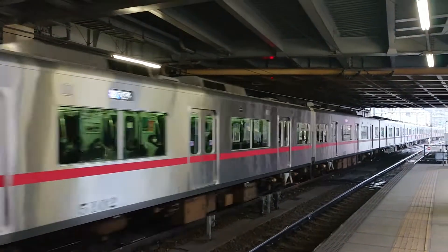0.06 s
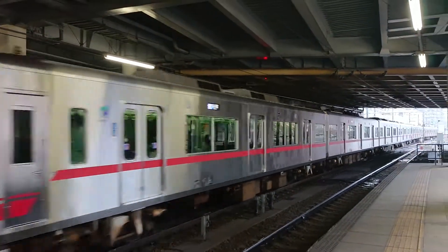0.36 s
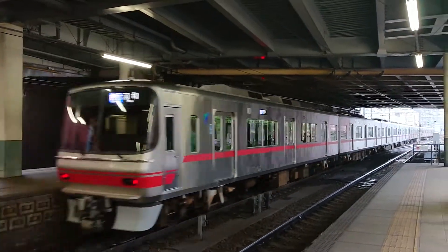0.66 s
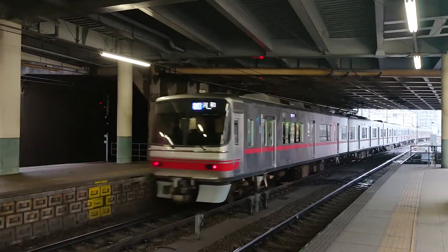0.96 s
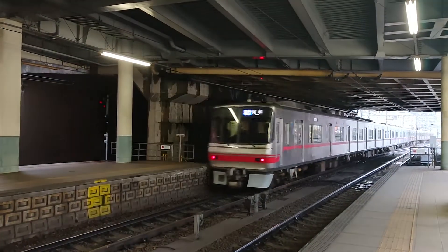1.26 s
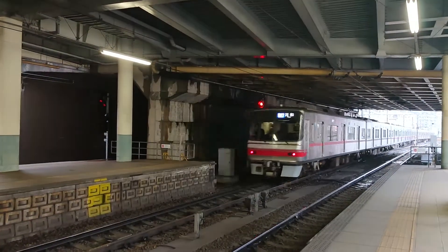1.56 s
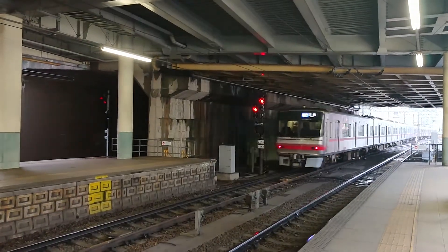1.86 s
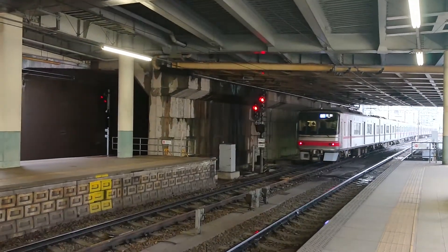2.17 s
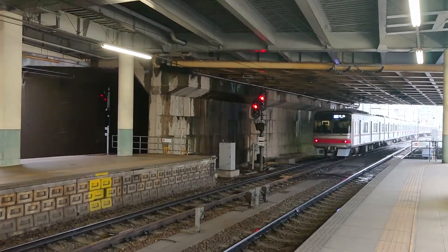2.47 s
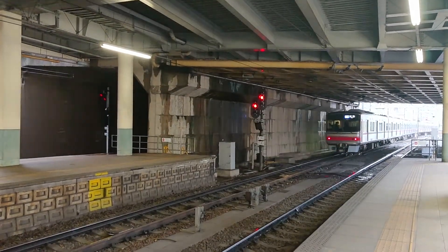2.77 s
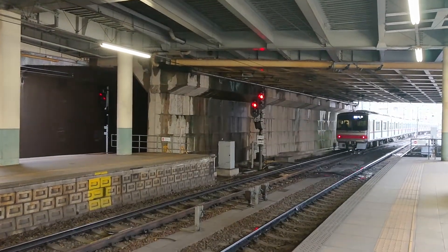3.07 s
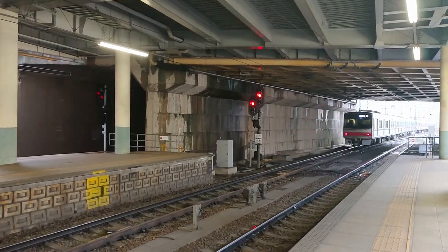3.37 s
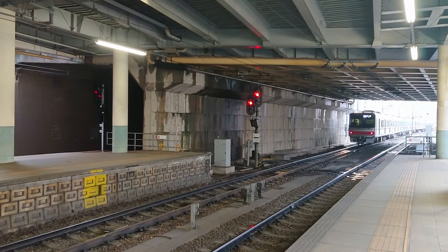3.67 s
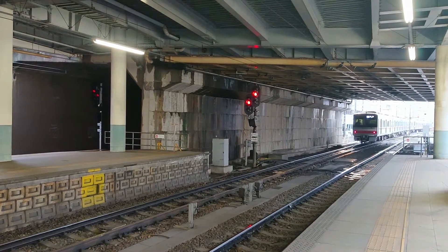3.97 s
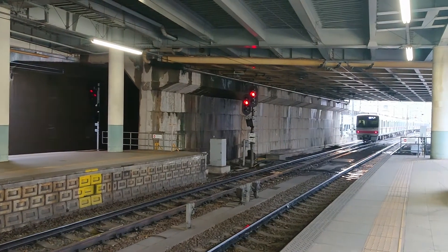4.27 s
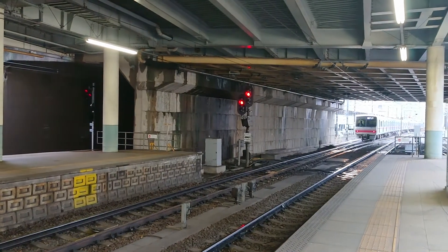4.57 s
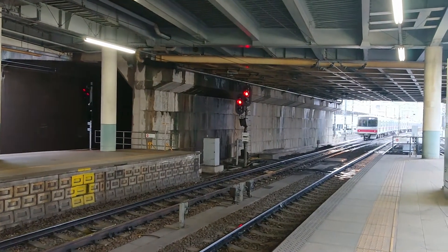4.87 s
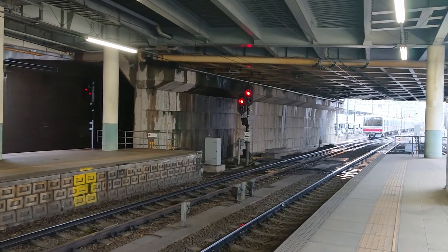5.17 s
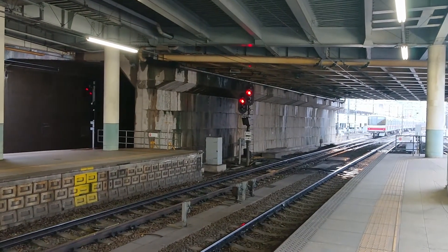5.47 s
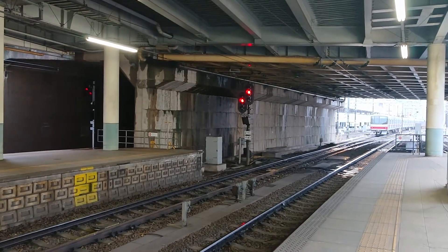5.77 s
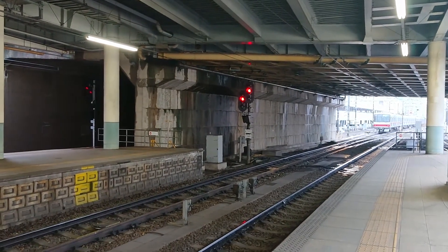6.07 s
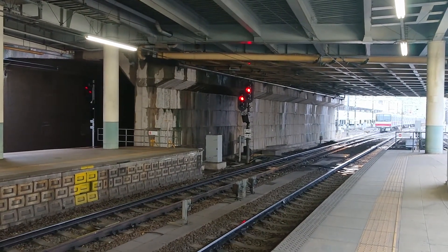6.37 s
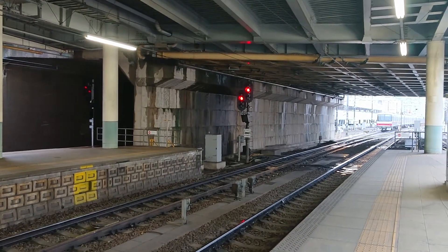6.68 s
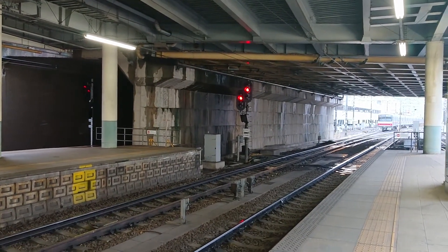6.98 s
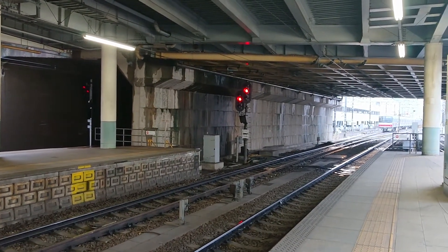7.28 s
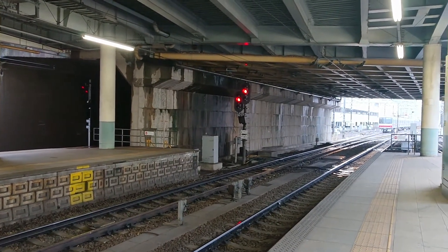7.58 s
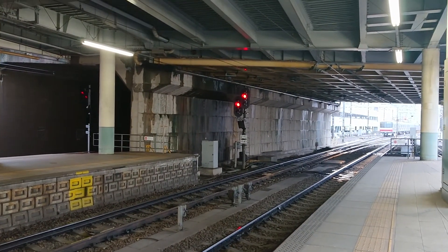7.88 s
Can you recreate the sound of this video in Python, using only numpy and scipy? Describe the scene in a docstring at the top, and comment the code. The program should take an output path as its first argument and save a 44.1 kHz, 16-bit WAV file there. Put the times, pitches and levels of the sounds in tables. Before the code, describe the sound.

An electric commuter train rolls away from a covered platform, its sounds echoing under a low steel and concrete roof. It starts close, with a deep rumble, a rolling wheel roar, ringing rails and a faint motor whine that fades within the first second. The wheels cross rail joints in quick double blows, each a metallic clang with a low thump. The loudest pairs land at about 0.3, 0.9 and 1.9 seconds, with heavy knocks and a bright clank at 2 seconds. From about 2.7 to 5.4 seconds the clatter continues softer and duller, the paired thumps coming every half second to a second as the train draws away. From 6 seconds on, only lighter clacks and small metallic clinks remain, around 6.1, 6.6 and 7.6 seconds, over a weakening rumble that lasts to the end at about 8 seconds.

```python
"""Electric train leaving a platform

A train rolls away under a low steel and concrete deck. Its bogies cross rail joints, two axles in quick
succession: each impact thumps the track and excites modes of wheel, frame and body, which clang through
the hall. Between the blows rough treads make the wheels roar and the rails sing, fading with distance
over a deep rumble and a faint motor whine."""
import sys
import numpy as np
from scipy import signal
from scipy.fft import rfft, irfft, next_fast_len
from scipy.io import wavfile

SR = 44100
rng = np.random.default_rng(int(sys.argv[2]) if len(sys.argv) > 2 else 0)


def waveform_to_disk(signal):
    """Save audio, clipped to [-1, 1], as 16-bit WAV at the path in sys.argv[1]."""
    frames = np.transpose(np.atleast_2d(signal))
    scaled = np.clip(frames, -1, 1) * 32767
    samples = np.round(scaled).astype(np.int16)
    wavfile.write(sys.argv[1], SR, samples)


N = 358533
TIME, HZ = np.arange(N) / SR, np.fft.rfftfreq(next_fast_len(N + 4096, real=True), 1 / SR)


def amp(db):
    """Amplitude ratio of a level in decibels."""
    return 10 ** (np.asarray(db) / 20)


def read(points, hz):
    """Interpolation of a spectrum on a log-frequency axis."""
    f, value = np.transpose(points)
    return np.interp(np.log(hz + 1), np.log(f + 1), value)


def unit_rms(x):
    """Normalisation to rms 1."""
    return x / np.sqrt(np.mean(x ** 2) + 1e-20)


def add(mix, s, sound):
    """Superposition: a sound joins the mix at s seconds."""
    part = mix[..., max(round(s * SR), 0):][..., :sound.shape[-1]]
    part += sound[..., :part.shape[-1]]


def colour(x, gain):
    """Linear filtering by a gain given at the frequencies HZ."""
    size = 2 * (len(HZ) - 1)
    return irfft(rfft(x, size) * gain, size)[..., :N]


def flutter(rate_hz, depth_db):
    """Random amplitude modulation, up to about the given rate."""
    slow_noise = colour(rng.standard_normal(N), 1 / (1 + (HZ / rate_hz) ** 4))
    return amp(depth_db * unit_rms(slow_noise))


def receding(db, halves_s):
    """Spherical spreading: amplitude falls as one over the distance of the train."""
    return amp(db) / (1 + TIME / halves_s)


def distant(near, far_colour, after_s):
    """Timbre changes with distance: a crossfade to a filtered copy as the train draws away."""
    gone = 1 - np.exp(-(TIME / after_s) ** 2)
    return (1 - gone) * near + gone * colour(near, amp(read(far_colour, HZ)))


def ring_down(blows, rise, ring_t60, hall_db, hall_t60):
    """Envelope of blows (s, dB) whose energies add: a brief ring, then the hall's reverberation."""
    t, power = TIME[:2 * SR], np.zeros(N)
    fall = amp(-60 * t / ring_t60) ** 2 + amp(hall_db - 60 * t / hall_t60) ** 2
    for s, db in blows:
        blur = rise * (1 + s / 6.0)  # far blows arrive blurred
        add(power, s, amp(db) ** 2 * (1 - np.exp(-t / blur)) * fall)
    return np.sqrt(power)


def pulse(hz, swell):
    """A heavily damped mode: a few cycles whose envelope peaks after swell seconds."""
    t = TIME[:SR // 2]
    u = t / swell
    return (u * np.exp(1 - u)) ** 2 * np.sin(2 * np.pi * hz * t)


def in_hall(sound, wet_db, t60):
    """Scattering from deck and walls, 600 echoes a second: rows (direct, echo, echo)."""
    t = TIME[:SR]
    taps = rng.standard_normal((2, SR)) * (rng.random((2, SR)) < 600 / SR)
    taps *= amp(-60 * t / t60) * (t > .02)
    taps *= amp(wet_db) / np.linalg.norm(taps[0])
    return signal.fftconvolve(np.vstack([t == 0, taps]), sound[None], axes=1)


# The hall's sound field. Each row: frequency in Hz, correlation of left and right.
COHERENCE = [(60, .975), (140, .96), (320, .87), (500, .76), (760, .4), (1150, .05), (1800, -.05)]
def diffuse(pair):
    """A diffuse field is coherent at two nearby points in the bass, incoherent in the treble."""
    same = np.clip(read(COHERENCE, HZ), -1, 1)
    mid, side = colour(pair, np.sqrt([(1 + same) / 2, (1 - same) / 2]))
    return np.array([mid + side, mid - side])


# Wheel and rail resonances. Each row: centre in Hz, width in Hz, lift in dB when ringing is 1.
STEEL_RESONANCES = [(1950, 130, 4), (2430, 200, 2), (2694, 234, -5.5), (3100, 180, 3)]
def vibration(spectrum, ringing):
    """Random forcing: diffuse noise of a given spectrum, shaped by the resonances of the steel."""
    lift_db = sum(db / (1 + (2 * (HZ - hz) / width) ** 2) for hz, width, db in STEEL_RESONANCES)
    gain = amp(read(spectrum, HZ) + ringing * lift_db)
    return unit_rms(diffuse(colour(rng.standard_normal((2, N)), gain)))


# Motor and gear lines. Each row: centre in Hz, width in Hz, starting level in dB.
MOTOR_LINES = [(366, 20, -26), (2506, 79, -35), (2930, 20, -39.5), (4010, 54, -43)]
def motors():
    """Line broadening: traction motors and gears whine in narrow bands that the hall blurs."""
    lines = sum(amp(db) / np.sqrt(width) / (1 + (2 * (HZ - hz) / width) ** 2)
                for hz, width, db in MOTOR_LINES)
    level = np.linalg.norm([amp(db) for *_, db in MOTOR_LINES])
    whine = unit_rms(diffuse(colour(rng.standard_normal((2, N)), lines)))
    return level * receding(0, halves_s=0.23) * whine


# Ground vibration. Each row: frequency in Hz, relative spectral level in dB.
GROUND_SPECTRUM = [(20, -44.5), (31, -32.5), (40, -13.5), (50, 5), (64, -2.5), (82, -4), (108, -14),
                   (150, -17), (300, -34), (1000, -79.5)]
def ground_rumble(swell):
    """Structure-borne sound: rough treads shake the ground, harder near a joint."""
    gain = np.hypot(receding(-27, halves_s=2.97), amp(-15.5) * swell)
    return vibration(GROUND_SPECTRUM, ringing=0) * gain


# The roar, and what distance does to it. Each row: frequency in Hz, relative level in dB.
ROAR_SPECTRUM = [(50, -30), (110, 0.5), (170, -1.5), (260, 1), (370, -2), (520, -2.5), (750, -9.5),
                 (1050, -13), (1400, -25), (2500, -20), (5000, -36)]
ROAR_DISTANCE = [(140, -13), (280, 0), (420, -0.5), (570, 2), (800, 0.5), (1300, 3)]
def wheel_roar(swell):
    """Roughness excitation: the treads shake the wheels, whose roar thins with distance."""
    roar = distant(vibration(ROAR_SPECTRUM, ringing=0.57), ROAR_DISTANCE, after_s=9.1)
    gain = np.hypot(receding(-27, halves_s=2.62), swell)
    return roar * gain * flutter(rate_hz=26, depth_db=1.5)


# The singing, and what distance does to it. Each row: frequency in Hz, relative level in dB.
RAIL_SPECTRUM = [(500, -31.5), (1100, -10), (1650, -11.5), (1950, -5.5), (2400, -3.5), (2750, -0.5),
                 (3100, -7.5), (3400, -8), (4500, -11), (5400, -15), (7000, -15.5), (11000, -7.5)]
RAIL_DISTANCE = [(1450, 10), (2000, 4), (3500, 1), (5000, 4), (7000, -3), (11000, -11.5)]
def rail_singing(swell):
    """Resonance: rolling and clanks drive the rails' high modes; air absorption dulls them far off."""
    rolling = np.hypot(receding(-21.5, halves_s=0.48), amp(-11.5) * swell)
    struck = ring_down(RAIL_CLANKS, rise=0.001, ring_t60=0.35, hall_db=-15.5, hall_t60=.9)
    singing = distant(vibration(RAIL_SPECTRUM, ringing=1.28), RAIL_DISTANCE, after_s=1.24)
    return singing * np.hypot(rolling, struck)


# Bright clanks that set the rails singing. Each row: start in seconds, relative level in dB.
RAIL_CLANKS = [(.336, -30), (.509, -26), (.868, -27), (1.035, -32), (1.863, -33), (2.028, -21),
               (2.757, -36), (3.16, -33), (3.275, -32.5), (4.222, -39), (4.383, -33), (5.186, -40),
               (5.343, -36), (6.094, -40), (6.257, -38), (6.593, -38.5), (6.74, -40), (7.555, -39),
               (7.652, -40)]
def clanks(low_hz, high_hz, level_db, t60, count):
    """Impulse response: each clank starts its own cluster of steel overtones, in random phases."""
    mix, t = np.zeros((2, N)), TIME[:SR // 3]
    for s, db in RAIL_CLANKS:
        place, *phases = rng.random((3, count, 1))
        hz = low_hz + (high_hz - low_hz) * (np.arange(count)[:, None] + place) / count
        cluster = np.sin(2 * np.pi * (hz * t + np.array(phases))).sum(1)
        add(mix, s, unit_rms(cluster) * amp(db + level_db - 60 * t / t60))
    return mix


# Lone metal rings. Each row: start in seconds, pitch in Hz, level in dB, 60 dB decay time in seconds.
METAL_CLINKS = [(1.823, 1225, -21, 0.09), (1.858, 773, -14, .08), (1.97, 1044, -23.5, 0.43),
                (2.036, 730, -6.5, 0.13), (4.387, 617, -16, 0.05), (5.343, 1106, -22, 0.057),
                (6.094, 1036, -24.5, 0.058), (6.262, 1036, -30, 0.07), (6.474, 278, -23.5, 0.15),
                (6.637, 339, -7.5, 0.045), (6.672, 295, -27.5, 0.36), (7.652, 565, -20, 0.054),
                (7.654, 1060, -26, 0.037)]
def clinks():
    """Free decay of a single mode: flanges and couplings ring briefly, and distant knocks ring on at a low
    pitch."""
    mix, t = np.zeros((3, N)), TIME[:SR // 4]
    for s, hz, db, t60 in METAL_CLINKS:
        ring = amp(db - 60 * t / t60) * (1 - np.exp(-t / 0.0034)) * np.sin(2 * np.pi * hz * t)
        add(mix, s, in_hall(ring, wet_db=-9.5, t60=0.85))
    return mix


# Heaves of the car body. Each row: start in seconds, level in dB.
BODY_HEAVES = [(0.336, -24), (0.872, -15.5)]
def heaves():
    """Damped oscillation: the car body heaves as a leading axle drops."""
    mix = np.zeros((3, N))
    for s, db in BODY_HEAVES:
        add(mix, s, in_hall(amp(db) * pulse(hz=73, swell=0.026), wet_db=-10.0, t60=0.59))
    return mix


# Knocks of the bogie frame. Each row: start in seconds, level in dB, pitch in Hz.
FRAME_KNOCKS = [(.336, -16, 203), (.515, -12, 268), (0.867, -22, 280), (1.038, -5.5, 231),
                (1.267, -21.5, 161), (1.428, -20.5, 182), (1.873, -6, 238), (1.935, -9.5, 182),
                (2.037, -5, 246), (2.111, -17, 252), (2.757, -16.5, 213), (2.926, -23.5, 151),
                (3.264, -16.5, 197), (3.438, -19, 272), (3.729, -21, 280), (4.22, -12.5, 201),
                (4.385, -13.5, 186), (4.998, -20, 224), (5.186, -15, 188), (5.345, -16.5, 246),
                (5.373, -16.5, 173), (7.496, -32, 402), (7.7, -33, 452)]
def frame_knocks():
    """Two inharmonic modes: the frame knocks after a blow, and again when it rebounds."""
    mix = np.zeros((3, N))
    for s, db, hz in FRAME_KNOCKS:
        knock = pulse(hz, swell=0.0065) + amp(-11) * pulse(2.45 * hz, swell=0.0048)
        wet_db = -11 + 1.77 * s  # the farther the train, the greater the share of echo
        add(mix, s, in_hall(amp(db) * knock, wet_db, t60=0.9))
    return mix


# Bogies crossing joints. Each row: start in seconds, lag of the second axle in seconds, then relative
# levels in dB: roar swell, clang, its accent on the second axle, thump, its accent on the second axle.
CROSSINGS = [(0.001, 0.17, -47, -19, -13.5, -17.5, -5.5), (0.331, 0.17, -20, -11.5, 2, -23.5, -9),
             (0.863, 0.17, -18, -10.5, 0, -27, 7), (1.262, 0.15, -27.5, -29.5, 1, -19.5, 1.5),
             (1.861, 0.15, -16.5, -10, 2, -33.5, -4), (2.253, 0.13, -25, -40, -2, -22.5, -2),
             (2.752, 0.17, -25.5, -27, 2, -16, 0), (3.255, 0.12, -24.5, -23.5, -12, -33, -0.5),
             (3.724, 0.16, -26.5, -25.5, -7, -18, -1), (4.217, .163, -26, -24.5, 2.5, -17, -1.5),
             (5.18, .16, -24.5, -28, -2, -17, 2), (6.095, 0.07, -37, -36, 1.5, -49, -2),
             (6.472, 0.18, -33.5, -35.5, 4.5, -56, 5), (7.489, 0.18, -33.5, -31.5, 0, -56, 2)]
def axles():
    """Impact excitation, two blows a bogie: (start s, clang dB, thump dB)."""
    for s, lag, _, clang_db, clang_accent, thump_db, thump_accent in CROSSINGS:
        yield s, clang_db, thump_db
        yield s + lag, clang_db + clang_accent, thump_db + thump_accent


def worn_rail_swell():
    """Wear near a joint raises the rolling noise: a gain that peaks just after each second axle."""
    power = np.zeros(N)
    rise_db_per_s, fall_db_per_s = 31, 30
    for s, lag, swell_db, *_ in CROSSINGS:
        t = TIME - (s + lag + 0.028)
        power += amp(swell_db - np.maximum(-t * rise_db_per_s, t * fall_db_per_s)) ** 2
    return np.sqrt(power)


def sleeper_thumps():
    """Elastic support: the sleeper gives way a moment after the steel is struck."""
    mix = np.zeros((3, N))
    for s, _, db in axles():
        thump = amp(db + 1) * pulse(hz=101.7, swell=0.011)
        add(mix, s + 0.00904, in_hall(thump, wet_db=-1.0, t60=0.9))
    return mix


# Wheel modes. Each row: pitch in Hz, dB added to the axle's clang level, 60 dB decay time in seconds.
WHEEL_MODES = [(471, -16.5, 0.24), (771, -16.5, 0.67), (843, -22, 0.57), (1083, -16.5, 0.38),
               (2275, -27, 0.58), (2540, -29.5, 1.0), (2890, -25, 0.28)]
def wheel_rings():
    """Normal modes: each struck wheel rings on at its own pitches, detuned by up to 1.2 percent."""
    mix, t = np.zeros((2, N)), TIME[:SR * 2 // 3]
    for s, clang_db, _ in axles():
        for hz, db, t60 in WHEEL_MODES:
            detune, phase, offset = 2 * rng.random(3) - 1
            right_shift = offset * np.array([[0], [1 - read(COHERENCE, hz)]]) / 2
            ring = np.sin(2 * np.pi * (hz * (1 + .012 * detune) * t + phase + right_shift))
            add(mix, s, ring * amp(clang_db + db - 60 * t / t60) * (1 - np.exp(-t / 0.0027)))
    return mix


# Struck steel, car body and track bed. Each row: frequency in Hz, relative spectral level in dB.
STEEL_SPECTRUM = [(300, -10.5), (750, 10.5), (1100, 7), (1600, 1), (2000, -4.5), (2500, 4), (3400, -4),
                  (4500, -5), (5200, -15)]
BODY_SPECTRUM = [(50, -31.5), (110, -2.5), (170, -1.5), (240, 0), (340, -4.5), (520, -3.5), (740, -8),
                 (1050, -15.5), (1500, -26.5), (5000, -58.5)]
BED_SPECTRUM = [(40, -20), (70, -6), (105, -1), (135, -2), (170, -7), (220, -6.5), (320, -15), (500, -15),
                (1000, -55)]
def joint_clangs():
    """Modal overlap: each blow excites modes of steel, body and track bed so dense they form noise."""
    strikes = [(s, clang_db) for s, clang_db, _ in axles()]
    drops = [(s, thump_db) for s, _, thump_db in axles()]
    clang = amp(-9) * ring_down(strikes, rise=0.019, ring_t60=0.3, hall_db=-1, hall_t60=1.31)
    crack = amp(-12) * ring_down(strikes, rise=0.001, ring_t60=0.076, hall_db=-28, hall_t60=.4)
    boom = amp(-2) * ring_down(strikes, rise=0.037, ring_t60=0.72, hall_db=-2.5, hall_t60=1.09)
    thud = amp(-2.5) * ring_down(drops, rise=0.0067, ring_t60=.35, hall_db=-10, hall_t60=1.4)
    steel = vibration(STEEL_SPECTRUM, ringing=0.9) * np.hypot(clang, crack)
    body = vibration(BODY_SPECTRUM, ringing=0.44) * boom
    bed = vibration(BED_SPECTRUM, ringing=0) * thud
    rattle = flutter(rate_hz=38, depth_db=1.0)  # loose gear chatters
    return (steel + body) * rattle + bed


def scene():
    """Superposition of the train's rolling noise, its impacts and their echoes under the deck."""
    swell = worn_rail_swell()
    rolling = motors() + ground_rumble(swell) + wheel_roar(swell) + rail_singing(swell)
    bite = clanks(low_hz=1895, high_hz=4977, level_db=-9.5, t60=.3, count=14)
    blows = clinks() + heaves() + frame_knocks() + sleeper_thumps()
    direct, echoes = blows[0], diffuse(blows[1:])
    return rolling + bite + direct + echoes + wheel_rings() + joint_clangs()


# Two small muffled microphone ports, the left duller. Each row: frequency in Hz, gain in dB.
LEFT_PORT = [(100, 0), (500, -4), (1400, -4.5), (2300, -8.5), (5000, -10.5), (6700, -18), (7400, -55.5),
             (9100, -41), (10000, -22), (10900, -18), (12700, -39.5), (15300, -37)]
RIGHT_PORT = [(100, 0), (500, -2), (1400, -1.5), (2300, 2.5), (5000, 0.5), (6000, -3), (6900, -12.5),
              (7600, -30), (8600, -44), (9500, -40), (15300, -41.5)]
def record(dry):
    """Soft saturation rounds the loudest blows; the ports filter the sound, up to a band limit."""
    rounded = dry / (1 + dry ** 8) ** .125
    ports = amp([read(LEFT_PORT, HZ), read(RIGHT_PORT, HZ)])
    band_limit = np.clip((15750 - HZ) / 100 + .5, 0, 1)
    return colour(rounded, ports * band_limit)


dry = scene()
out = record(dry)
waveform_to_disk(out)
```